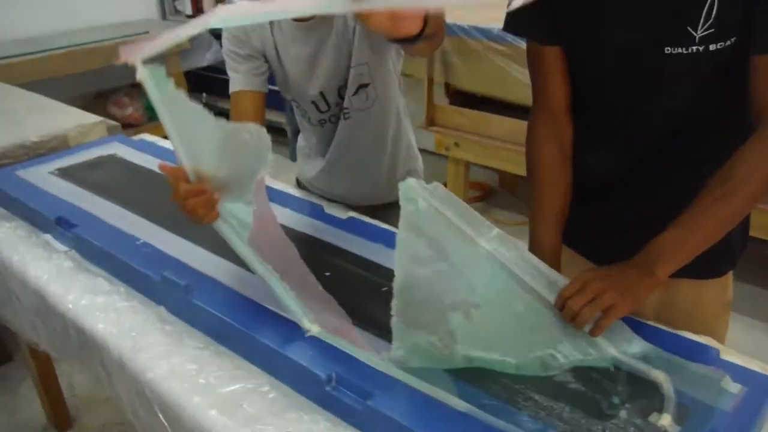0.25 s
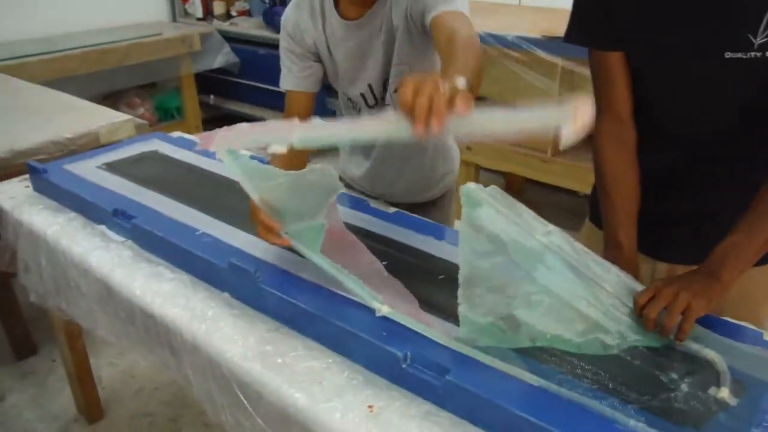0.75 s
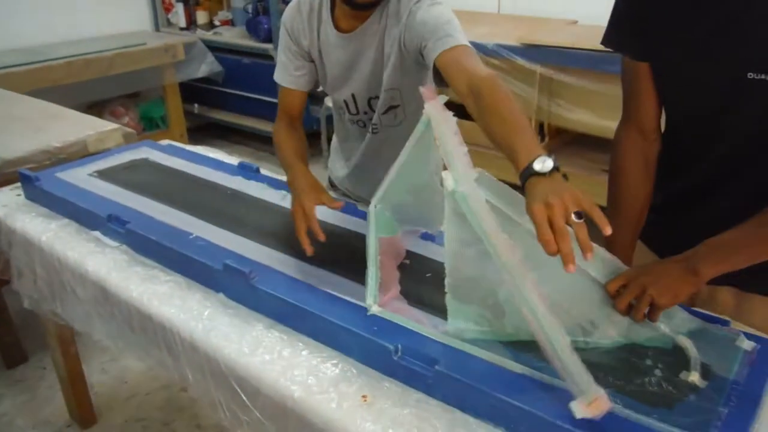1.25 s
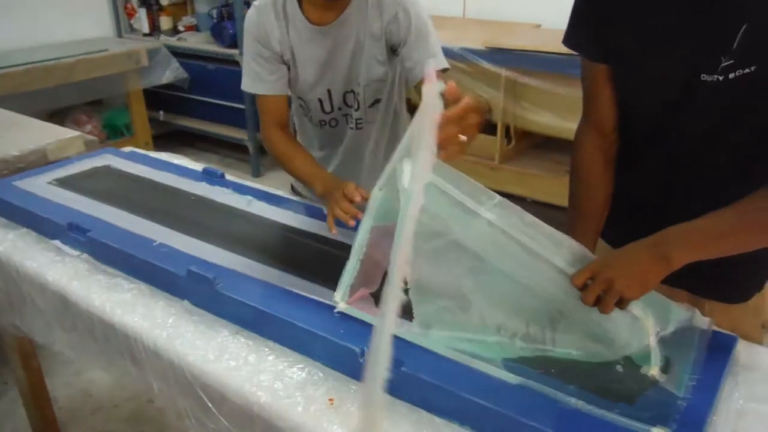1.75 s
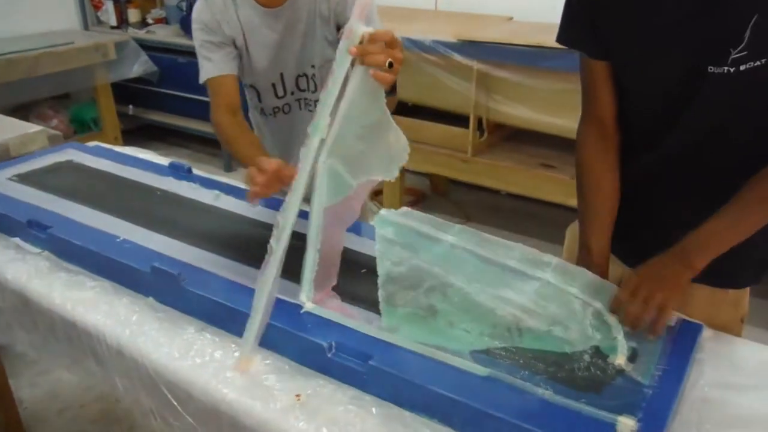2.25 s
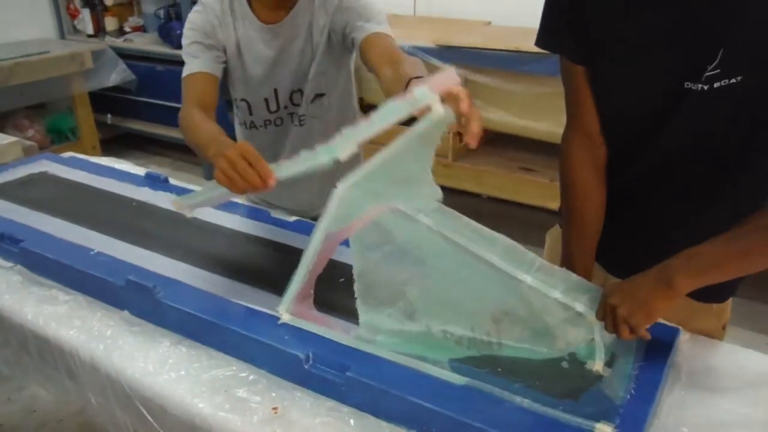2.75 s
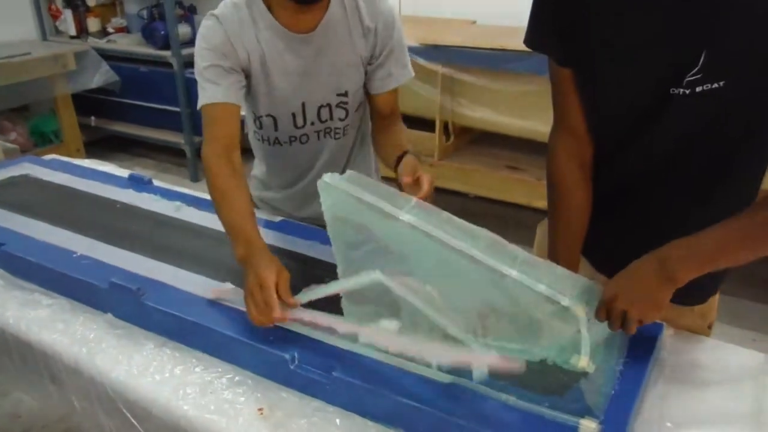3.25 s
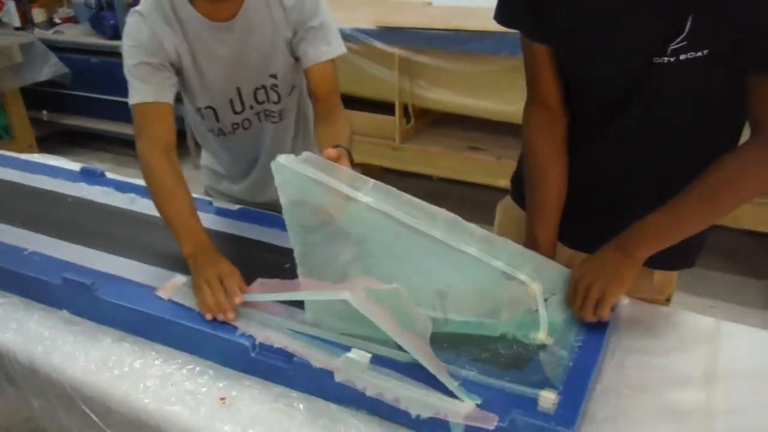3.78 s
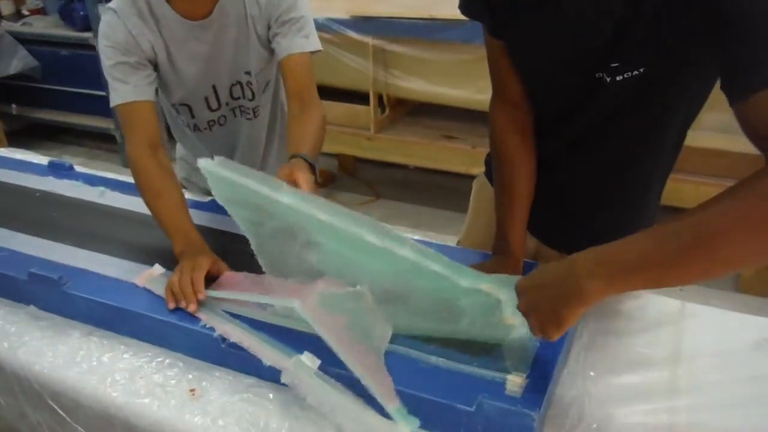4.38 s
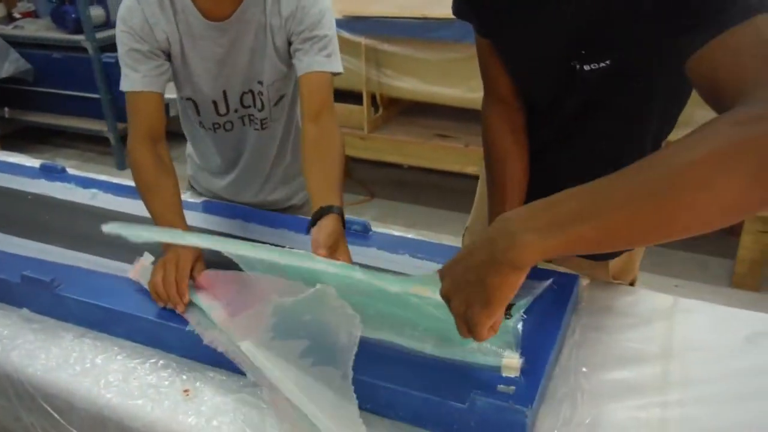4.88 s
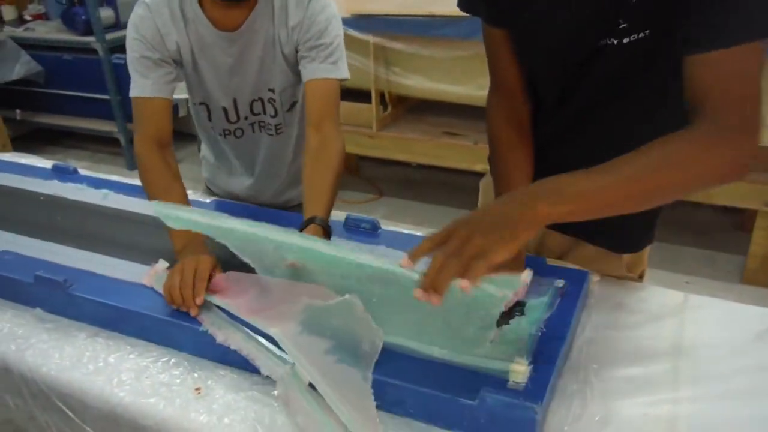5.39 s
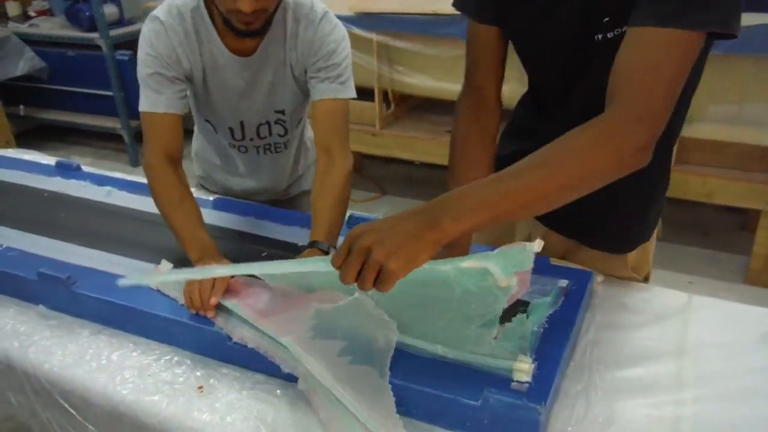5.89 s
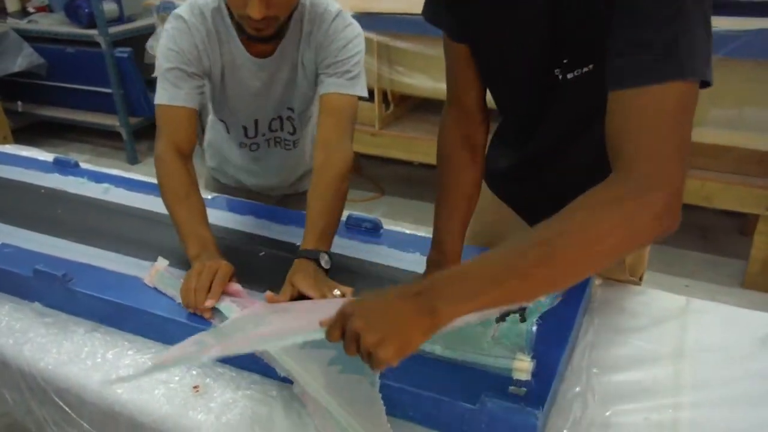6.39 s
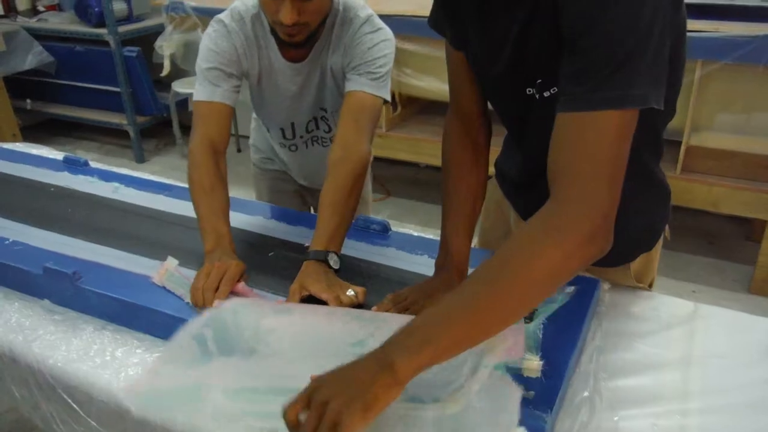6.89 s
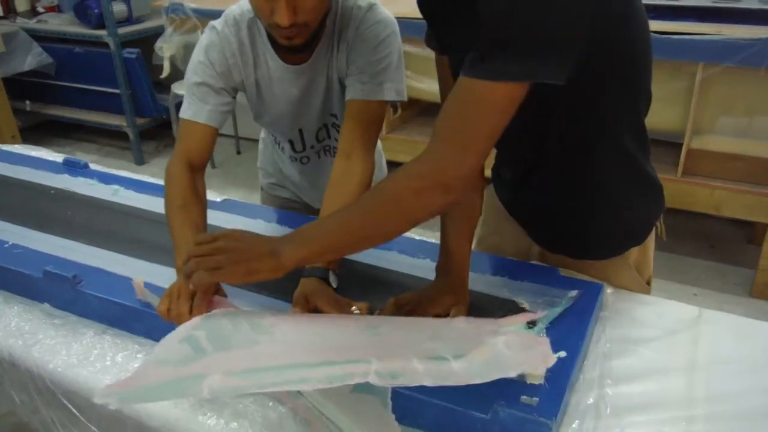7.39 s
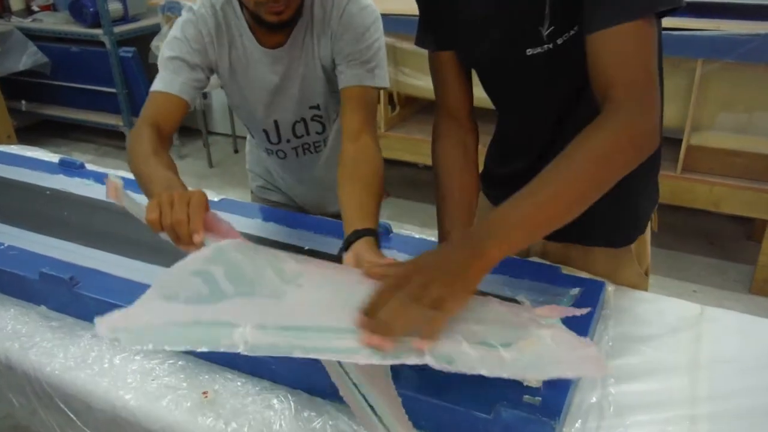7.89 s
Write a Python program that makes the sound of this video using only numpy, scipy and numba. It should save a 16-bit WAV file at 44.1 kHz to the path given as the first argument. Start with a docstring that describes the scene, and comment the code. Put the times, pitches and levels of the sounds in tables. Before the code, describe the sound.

A close view of stiff, thin plastic film handled on a hollow mould in a workshop with a short reverberant tail and faint steady hiss. It opens with a sliding rustle and a hard snap at 0.2 s. Around 1.0-1.2 s a pull crackles densely with rapid sharp pops; more tearing and a loose knock follow near 1.4-1.7 s. A quieter slide leads to another crackling cluster at 2.5-2.9 s, with a hollow buckling note. After light sliding and a small knock near 3.6 s, strong crackles and snaps run from 4.0 to 4.8 s. From 5 s handling softens to faint rubbing and rustle. Tiny high squeaks and clicks come around 6.0 s, a crisp knock at 6.65 s, a hollow slap and scrape at 7.1 s, a brief crackle with a dull landing at 7.8 s, then faint ticks.

```python
"""Thin cured plastic sheets and film are peeled by hand off a long hollow mould in a workshop and laid on it.
At first pulls crackle in swarms of tiny cracks, sheets slide, creases snap through and loose sheets knock the mould.
After five seconds the handling is mostly softer; stiff corners squeak near six seconds, and one late pull crackles.
Shaped noise forces sound through the crisp film edge, the flexing sheet and the mould, and the room rings on.
Resonators add buckling notes, rubbing tones and a bench drone, over bright film ticks and steady background noise."""
import sys
import numpy as np
from scipy import signal
from scipy.fft import rfft, irfft
from scipy.io import wavfile
from scipy.ndimage import uniform_filter1d
from numba import njit

SR = 44100
rng = np.random.default_rng(int(sys.argv[2]) if len(sys.argv) > 2 else 0)


def persist_wave(psi):
    """Save psi, clipped to +-1, as 16-bit WAV."""
    counts = np.round(np.clip(psi, -1, 1) * 32767).astype(np.int16)
    wavfile.write(sys.argv[1], SR, np.atleast_2d(counts).T)


N = 358974

# creases and bond spots that snap: start_s, level_db, sheet_relative_db, flutter_decay_ms
CREASE_SNAPS = [(.197, -11, -6.5, 3), (0.3456, -24.5, -22, 4.1), (0.4155, -24, -28, 1.6),
                (0.96, -17.5, -3.5, 2.5), (.9922, -23, -14, 2), (1.005, -12.5, -7.5, 3.9),
                (1.0208, -12.5, 0.5, 1.8), (1.0279, -13, 0, 3.3), (1.036, -15, -1, 4.6),
                (1.068, -13.5, -10, 3), (1.0918, -8.5, -0.5, 3.5), (1.363, -23.5, -6.5, 5.3),
                (1.528, -14, -7, 3), (1.5534, -11.5, -6, 4), (1.6025, -17, 4.5, 4.3),
                (2.029, -31.5, -11, 2.7), (2.318, -23.5, -5, 3.3), (2.493, -21.5, -2.5, 4.9),
                (2.5288, -17.5, 0, 1.3), (2.5715, -13.5, -1.5, 2.9), (2.622, -11.5, -4, 4),
                (2.644, -13, -7, 4.6), (2.6652, -14.5, -7, 3.1), (2.808, -15.5, -3, 2.5),
                (2.8472, -16.5, -3, 3.9), (2.92, -19, -2, 2.6), (3.372, -28, 3.5, 1.9),
                (3.5325, -15.5, -9, 1.5), (4.005, -18, -7, 1.9), (4.0187, -13.5, 1, 2.5),
                (4.0332, -10, -10, 1.8), (4.0592, -12.5, -14, 2), (4.12, -12, -5.5, 2.5),
                (4.207, -17, -19, 1.7), (4.6157, -20, -8, 3.5), (4.6405, -18, -3, 2.8),
                (4.7591, -15.5, -9, 3.4), (4.8113, -16, -11, 1.8), (5.1918, -39, -11, 1.8),
                (5.224, -29, 0, 2.2), (5.5188, -34, -16, 2.1), (5.5659, -30.5, -2, 3.5),
                (5.6518, -31.5, -8, 4.9), (5.77, -18, -8, 3.3), (5.8002, -23.5, -3.5, 3),
                (5.9856, -22.5, -3.5, 3.1), (6.0446, -20, -12, 4.8), (6.087, -21.5, -10, 2.8),
                (6.1322, -16, -8, 1.9), (6.2061, -19, -4.5, 1.4), (6.2627, -16.5, -14, 0.75),
                (6.4151, -23, -19, .8), (6.422, -18, -11, 3.7), (6.8606, -28.5, -13, 1.9),
                (7.212, -21.5, -1.5, 2.2), (7.652, -26, -14, 3), (7.723, -30, -14, 5.4),
                (7.817, -16, -4, 3.3), (7.87, -17, -21, 1.9), (8.0937, -33.5, -21, 3.4),
                (8.129, -24.5, -21, 2.5)]
# sheets and hands landing on the mould, and one crease snapping at 5.37 s that shakes the mould: start_s,
# level_db, # sheet_relative_db, mould_relative_db, rise_ms, clatter_decay_ms, contact_corner_hz,
# favoured_ring_hz, ring_relative_db
LANDINGS = [(0.539,-54.5,-5,9,2,4.9,6000,440,-14), (1.618,-18,2.5,-8,0.87,7.5,10000,443,-10),
            (2.14,-44.5,7,-4,0.3,7.9,10000,486,-19), (3.335,-36,8.5,-2,0.23,17.5,11000,656,-10.5),
            (3.592,-22,-8,-24,0.082,5.2,6400,1230,-28), (3.902,-33.5,10,-12,0.9,4.1,8870,1480,-14),
            (5.191,-31.5,1.5,-12,.3,3.9,11000,600,-21), (5.371,-46,1,-7,.5,26,11900,480,-24),
            (6.175,-32.5,12.5,-3,.4,5,7000,750,-25), (6.526,-27.5,5,-2.5,0.67,14,6960,496,-21),
            (6.654,-13.5,2,-15,0.077,3.7,11000,640,-34), (7.125,-15.5,-1.5,-23,1.5,8.2,7600,464,-11),
            (7.176,-26,-5,-17,1.5,16,10000,482,-14.5), (7.778,-18,-6,-10,5.5,7.2,12000,490,-30)]


def handling():
    """Superposition of independent forces: the powers of holding, pulls and slides add in edge, sheet and mould."""
    # faint rustle of sheets held in the hands: level_db, sheet_relative_db, mould_relative_db
    held_rustle = (-66.5, 2.3, -5)
    # pulls that tear the film off the mould: start_s, length_s, crackle_level_db, swell_over_pull_db,
    # sheet_relative_db, mould_relative_db
    pulls = [(0.0, 0.015, -24, -19, -2, -15.5), (1.018, 0.19, -30, -6.5, -6, -17.5),
             (1.36, 0.23, -32.5, 12.5, -7, -26), (1.606, 0.096, -22.5, -9.5, -4.5, -19.5),
             (2.535, 0.18, -29.5, -1, -3.5, -22), (2.81, 0.094, -25.5, 8, -6.5, -22.5),
             (4.031, 0.31, -28.5, -9.5, -5.5, -19), (4.322, 0.13, -24, 10, -8, -22.5),
             (4.454, 0.11, -23, 10, -6, -20), (4.717, 0.03, -29.5, 6.5, -4, -22),
             (7.798, 0.042, -35, 6, -2.5, -17)]
    # loose sheets sliding over the mould: start_s, length_s, level_db, swell_over_slide_db,
    # sheet_relative_db, mould_relative_db
    slides = [(0.0, 0.46, -43.5, -10.5, -6, -19), (0.496, 0.1, -53.5, 5.5, -4, -13),
              (0.807, 0.26, -45, 9.5, -2.5, -20), (1.192, 0.16, -40, 2, -2.5, -15),
              (1.887, 0.53, -51, 0, -5, -19), (2.259, 0.3, -44, -6, 1, -7.5), (2.72, .1, -38.5, 4, -8, -18),
              (2.924, .39, -45.5, -13.5, -4, -15), (3.415, 0.48, -53.5, 2.5, 1, -10),
              (3.581, 0.045, -44.5, 2.5, 9.5, -5), (3.902, 0.064, -41.5, 3, -2, -16),
              (4.582, 0.27, -39, -16, -1, -12), (4.895, 0.16, -52, -3, -1.5, -15),
              (5.196, .07, -57.5, -4, -12, -6), (5.37, 0.28, -54.5, 7, 1, -8),
              (5.671, 0.18, -46.5, 5.5, 2, -7), (5.967, 0.49, -42, -1.5, -3, -13.5),
              (6.427, 0.19, -41.5, 4, -0.5, -8), (6.775, 0.19, -55, 6, 2.5, -10),
              (7.13, 0.069, -31.5, -12, -5, -8.5), (7.497, .06, -50.5, 0, -8, -15),
              (7.636, 0.14, -43.5, 8, -7, -17), (7.908, 0.1, -45.5, 6.5, -7, -22),
              (8.106, 0.069, -52, 2, -3, -26)]
    power = np.outer(shares(*held_rustle) ** 2, np.ones(N))
    for movements, attack_s, release_s in [(pulls, .009, .026), (slides, .0038, .038)]:
        for s, length_s, db, swell_db, sheet_db, mould_db in movements:
            movement = stroke(length_s, db, swell_db, attack_s, release_s)
            add(power, s, np.outer(shares(0, sheet_db, mould_db), movement) ** 2)
    return np.sqrt(power)


def peeling(drive, cracks_per_s, spread_db, patchy_db, crack_s, rub, even_s):
    """Fracture noise: swarms of tiny cracks of very unequal size over the smooth rub of sliding film."""
    db = 20 * np.log10(drive[0])
    # a harder pull opens more cracks a second
    rate = cracks_per_s * amp(0.21 * (db - db.mean()))
    opens = rng.random(N) < rate / SR
    cracks = opens * amp(spread_db * np.minimum(rng.exponential(size=N), 4))
    grains = []
    for decay_s in crack_s:
        # each crack shakes edge, sheet and mould in its own proportions
        uneven = cracks * amp(patchy_db * rng.standard_normal(N))
        power = linger(uneven ** 2, decay_s)
        # the hand feeds in energy steadily, however it is split among the cracks
        power /= np.abs(uniform_filter1d(power, int(even_s * SR))) + 1e-9
        grains.append(np.sqrt((power + rub) / (1 + rub)))
    return drive * np.array(grains) * rng.standard_normal(N)


def snapping(rise_ms, plain_db, crease_db, width_hz, give_ms, give_db, size=1024):
    """Snap-through instability: a crease gives a little, then flips with a sharp click coloured by its length."""
    mould_relative_db = -23.5
    force = np.zeros((3, N))
    pitches = rng.uniform(3000, 8500, len(CREASE_SNAPS))
    noise_pairs = rng.standard_normal((len(CREASE_SNAPS), 2, size))
    for (s, db, sheet_db, decay_ms), hz, noises in zip(CREASE_SNAPS, pitches, noise_pairs):
        for start, stage_db, noise in zip([s - give_ms / 1000, s], [give_db, 0], noises):
            flutter = burst(noise, rise_ms, decay_ms)
            ring = resonance(flutter, np.full(size, hz), float(width_hz))
            edge = amp(plain_db) * flutter + amp(crease_db) * ring
            levels = shares(db + stage_db, sheet_db, mould_relative_db)
            add(force, start, levels[:, None] * np.array([edge, flutter, flutter]))
    return force


def crinkling(drive, creases_per_s, over_db, spread_db, decay_ms, most_db, size=1024):
    """Small random instabilities: creases flip above the crackle, up to the force a crease can hold."""
    force = np.zeros((3, N))
    for i in np.flatnonzero(rng.random(N) < creases_per_s / SR):
        scatter = rng.uniform(-1, 1)
        strength = drive[:, i] * amp(over_db + spread_db * scatter)
        # smooth ceiling on the edge force; all three shares shrink together
        strength /= np.hypot(1, strength[0] / amp(most_db))
        add(force, i / SR, np.outer(strength, burst(rng.standard_normal(size), 0, decay_ms)))
    return force


def knocking(size=4096):
    """Contact mechanics: many points land in quick succession, and a softer contact is duller."""
    force = np.zeros((3, N))
    for row, noise in zip(LANDINGS, rng.standard_normal((len(LANDINGS), size))):
        s, *levels, rise_ms, decay_ms, contact_hz = row[:-2]
        clatter = soften(burst(noise, rise_ms, decay_ms), contact_hz, order=2)
        add(force, s, np.outer(shares(*levels), clatter))
    return force


def ringing(octaves):
    """Modal superposition: the mould struck by a landing sheet rings on, and where the sheet lands favours the
    modes near one pitch."""
    # what the struck mould rings with: pitch_hz, relative_level_db, t60_s
    mould_modes = [(446,-15.5,0.33), (482,-1.5,0.61), (543,-27,0.47), (645,7,0.31), (745,14,0.41),
                   (969,2,.27), (1225,12,0.2), (1430,10,0.31), (1690,6,.16), (1920,-3,.12), (2290,-14,.4),
                   (3284,-7,.15), (3630,0,0.38)]
    t, out = np.arange(SR // 2) / SR, np.zeros(N)
    hz, db, t60 = np.transpose(mould_modes)[:, :, None]
    modes = amp(db) * np.sin(2 * np.pi * hz * t) * np.exp(-np.log(1000) * t / t60)
    for s, level_db, *_, favoured_hz, relative_db in LANDINGS:
        weights = 1 / (1 + (np.log2(hz / favoured_hz) / octaves) ** 2)
        add(out, s, amp(level_db + relative_db) * np.sum(weights * modes, axis=0))
    return out


def squeaking():
    """Excitation of narrow resonances: buckling sheet gives a hollow note, dragging stiff corners squeak higher."""
    # the sheet buckles: start_s, pitch_hz, level_db, decay_ms
    buckles = [(.198, 1440, -34, 54), (1.004, 1210, -23, 14), (1.065, 1160, -23, 7.9),
               (1.172, 1390, -27, 7.1), (1.511, 1180, -30.5, 9.1), (1.569, 1650, -27, 10),
               (2.62, 1810, -24, 32), (3.337, 1220, -46, 19), (3.597, 1180, -37, 25), (4.05, 1950, -29, 70),
               (4.235, 1590, -29, 28), (7.126, 710, -21, 8.1), (7.125, 1290, -19, 11),
               (7.66, 1590, -50, 100)]
    # a stiff corner drags and squeaks: start_s, pitch_hz, width_hz, level_db, decay_ms
    squeaks = [(5.947, 5950, 300, -32, 10), (5.985, 5780, 250, -23, 15), (5.986, 8540, 400, -31, 11),
               (6.043, 6100, 350, -38, 11), (6.044, 8850, 500, -35, 10)]
    buckle_width_hz = 190
    out = np.zeros(N)
    for s, hz, db, decay_ms in buckles:
        add(out, s, slipping(hz, buckle_width_hz, db, decay_ms))
    for s, *squeak in squeaks:
        add(out, s, slipping(*squeak))
    return out


def slipping(hz, width_hz, db, decay_ms, size=16384):
    """Stick-slip: a run of quick slips rings one narrow resonance, which keeps the energy of the slips."""
    slips = burst(rng.standard_normal(size), 0.71, decay_ms)
    tone = unit(resonance(slips, np.full(size, float(hz)), float(width_hz)))
    return amp(db) * np.linalg.norm(slips) * tone


def rubbing(attack_s, release_s):
    """Sustained friction: a steady slide of hand or sheet holds one narrow resonance as long as it lasts."""
    # faint rubbing tones: start_s, length_s, pitch_hz, level_db
    rubs = [(5.62, .25, 3420, -54), (5.703, 0.36, 2350, -52), (7.398, .24, 2290, -62)]
    width_hz = 80
    out = np.zeros(N)
    for (s, length_s, hz, db), friction in zip(rubs, rng.standard_normal((len(rubs), SR))):
        tone = resonance(friction, np.full(SR, float(hz)), float(width_hz))
        pressure = stroke(length_s, db, 0, attack_s, release_s)[:SR]
        add(out, s, pressure * tone[:len(pressure)] / tone.std())
    return out


def droning(attack_s, release_s):
    """Forced vibration: the friction of dragged sheets shakes the bench in its low resonances."""
    # bench resonances: pitch_hz, width_hz, relative_level_db
    bench_modes = [(62,14,-8), (132.4,7.6,4), (225,100,-1.5)]
    # sheets dragged along the mould: start_s, length_s, level_db, swell_over_drag_db
    drags = [(0.0, 0.25, -66, -8), (1.598, 0.077, -58, 5), (2.273, 0.21, -58, -13), (3.54, 0.2, -57, -3),
             (3.757, 0.89, -68, -3), (4.564, 0.096, -56, -1), (5.36, 0.51, -64, 11),
             (5.85, 0.89, -66.5, -4), (7.22, 0.089, -58, -0.5)]
    friction, pressure = rng.standard_normal(N), np.zeros(N)
    drone = np.zeros(N)
    for hz, width, db in bench_modes:
        drone += amp(db) * resonance(friction, np.full(N, float(hz)), float(width))
    for s, *drag in drags:
        add(pressure, s, stroke(*drag, attack_s, release_s))
    return pressure * drone / drone.std()


def settling(ticks_per_s, db, spread_db, decay_ms, hz, width_hz, tip_db, size=256):
    """Stress relaxation: thin film ticks, faint and bright, once with every snap alike and at random."""
    out = np.zeros(N)
    for (s, *_), noise in zip(CREASE_SNAPS, rng.standard_normal((len(CREASE_SNAPS), size))):
        add(out, s, amp(tip_db) * burst(noise, 0, decay_ms))
    for i in np.flatnonzero(rng.random(N) < ticks_per_s / SR):
        scatter = rng.uniform(-1, 1)
        add(out, i / SR, amp(db + spread_db * scatter) * burst(rng.standard_normal(size), 0, decay_ms))
    centre = np.full(N, float(hz))
    once = resonance(out, centre, float(width_hz))
    return resonance(once, centre, float(width_hz))


def bending(force, width_hz, bend_db, broad_db):
    """Stiffness sets pitch: the sheet's main resonance slides as the hands bend it."""
    # main resonance of the bent sheet: time_s, pitch_hz
    bend_path = [(.3, 1430), (1.0, 1270), (1.6, 1700), (2.3, 1500), (2.6, 1970), (2.95, 1760), (3.3, 1220),
                 (3.7, 1160), (4.051, 1920), (4.45, 1350), (4.65, 1650), (5.5, 1100), (6.6, 1930),
                 (7.12, 1340), (7.7, 1570)]
    hz = np.interp(np.arange(N) / SR, *np.transpose(bend_path))
    return amp(broad_db) * force + amp(bend_db) * resonance(force, hz, float(width_hz))


def radiating(edge, sheet, mould):
    """Radiation filtering: each body passes the band that suits its size and stiffness."""
    # colour of the crisp film edge: pitch_hz, relative_level_db
    edge_colour = [(1200,-51), (2100,-11), (2700,-3.5), (3250,-0.5), (4200,-0.5), (5900,1.5), (7500,-1),
                   (10500,-8.5), (13600,-18), (16000,-29)]
    # colour of the flexing sheet: pitch_hz, relative_level_db
    sheet_colour = [(350, -37.5), (540, -9), (650, 2), (820, -1), (1150, 1.5), (1500, 0), (1950, 1),
                    (2400, 0), (3100, 0), (4300, -7), (8000, -44)]
    # colour of the hollow mould: pitch_hz, relative_level_db
    mould_colour = [(30,-64), (95,-28), (125,-15), (160,-20), (260,-7), (360,-7), (480,2), (580,1),
                    (750,-3), (1600,-41.5)]
    return colour(edge, edge_colour) + colour(sheet, sheet_colour) + colour(mould, mould_colour)


def reverberating(forces, **room):
    """Exponential energy decay: edge, sheet and mould each excite the room with their own reverberation time."""
    # reverberation times of edge, sheet and mould sound: t60_s
    body_t60 = [0.46, 0.57, 0.51]
    return [workshop(force, t60, **room) for force, t60 in zip(forces, body_t60)]


def workshop(x, t60, wet_db, early_db, build_s, absorb_hz, count=12):
    """Room acoustics: a few reflections from bench and floor, then a diffuse field stores and loses energy."""
    early = np.zeros(SR // 10)
    delays_s = rng.uniform(.003, .022, count)
    early[(delays_s * SR).astype(int)] = rng.standard_normal(count)
    # t60 is the time for power to fall a millionfold
    stored = linger(linger(x ** 2, build_s), t60 / np.log(10 ** 6))
    diffuse = soften(np.sqrt(stored) * rng.standard_normal(N), absorb_hz)
    return x + amp(early_db) * convolve(x, unit(early)) + amp(wet_db) * diffuse


def background(level_db):
    """Stationary random noise: white noise filtered to the steady spectrum of the workshop."""
    # workshop background: pitch_hz, relative_density_db
    air_colour = [(25,-19), (60,-4), (100,-3), (250,-1), (500,-2), (1500,4), (5000,0.5), (9000,-7),
                  (16000,-33)]
    return amp(level_db) * colour(rng.standard_normal(N), air_colour)


def stroke(length_s, db, swell_db, attack_s, release_s):
    """Envelope of one hand movement: it takes hold, swells or fades steadily, and lets go."""
    t = np.arange(int((length_s + 10 * release_s) * SR)) / SR
    hold = amp(db + swell_db * (np.minimum(t / length_s, 1) - .5))
    return hold * np.minimum(t / attack_s, 1) * np.exp(-np.maximum(t - length_s, 0) / release_s)


def burst(noise, rise_ms, decay_ms):
    """Damped impact: a noisy flutter starts abruptly and dies away, its energy proportional to its decay."""
    rise, decay = np.maximum([rise_ms, decay_ms], .05) * SR / 1000
    n = np.arange(len(noise)) + 1
    flutter = np.tanh(noise) * (1 - np.exp(-n / rise)) * np.exp(-n / decay)
    return unit(flutter) * np.sqrt(decay / 2)


def shares(db, sheet_db, mould_db):
    """Force division: how hard one force drives edge, sheet and mould."""
    return amp([db, db + sheet_db, db + mould_db])


@njit
def resonance(x, hz, width):
    """Second-order resonator: a band-pass whose centre may move, with gain 1 at the centre."""
    y, band, low = np.empty(len(x)), 0., 0.
    for i in range(len(x)):
        g, k = np.tan(np.pi * hz[i] / SR), width / hz[i]
        v = (band + g * (x[i] - low)) / (1 + g * (g + k))
        band, low, y[i] = 2 * v - band, low + 2 * g * v, k * v
    return y


def colour(x, points, size=4096):
    """Minimum-phase filtering: a causal filter has the given spectrum, and white noise keeps its power."""
    log_gain = np.log(amp(on_log_axis(np.fft.rfftfreq(size, 1 / SR), points)))
    # folding the cepstrum forward in time makes the response causal
    cepstrum = irfft(log_gain)
    cepstrum[1:size // 2] *= 2
    cepstrum[size // 2 + 1:] = 0
    return convolve(x, unit(irfft(np.exp(rfft(cepstrum)))))


def soften(x, hz, order=1):
    """Treble absorption: a gentle low-pass."""
    return signal.lfilter(*signal.butter(order, hz, fs=SR), x)


def linger(power, decay_s):
    """Energy storage: each bit of power is spread over an exponential decay."""
    keep = np.exp(-1 / (decay_s * SR))
    return signal.lfilter([1 - keep], [1, -keep], power)


def convolve(x, response):
    """Linear superposition: pass a sound through an impulse response."""
    return signal.fftconvolve(x, response)[:N]


def amp(db):
    """Logarithmic level: decibels to amplitude gain."""
    return 10 ** (np.asarray(db) / 20)


def on_log_axis(hz, points):
    """Logarithmic pitch scale: interpolate (Hz, value) points along it."""
    f, value = np.transpose(points)
    return np.interp(np.log(np.maximum(hz, 1)), np.log(f), value)


def unit(x):
    """Energy normalisation: scale the sum of squares to one."""
    return x / np.sqrt(np.sum(x ** 2))


def add(track, s, sound):
    """Superposition: mix a sound into a track from time s on."""
    start = int(np.clip(s * SR, 0, N - 1))
    track[..., start:start + sound.shape[-1]] += sound[..., :N - start]


def scene():
    """Source, body and room in series: forces sound through edge, sheet and mould; other sounds are added."""
    drive = handling()
    # crack_s holds the crack decays of edge, sheet and mould; rub is a power relative to the cracks
    crackle = peeling(drive, cracks_per_s=500, spread_db=3.2, patchy_db=2.0,
                      crack_s=[.0007, .0013, .003], rub=.18, even_s=0.0385)
    snaps = snapping(rise_ms=0.065, plain_db=-3.0, crease_db=-1.0, width_hz=1280, give_ms=3.5, give_db=-19.5)
    creases = crinkling(drive, creases_per_s=14, over_db=7, spread_db=6, decay_ms=3.0, most_db=-14.5)
    forces = crackle + creases + snaps + knocking()
    edge, sheet, mould = reverberating(forces, wet_db=-2.5, early_db=-10.5, build_s=0.0022, absorb_hz=12100)
    sheet = bending(sheet, width_hz=570, bend_db=-9.5, broad_db=-2.0)
    plastic = radiating(edge, sheet, mould)
    ticks = settling(ticks_per_s=11, db=-52, spread_db=5, decay_ms=.7, hz=11000, width_hz=8100, tip_db=-32)
    rubs = rubbing(attack_s=.03, release_s=.04)
    drone = droning(attack_s=.03, release_s=0.07)
    friction = squeaking() + rubs + drone
    return (plastic + ringing(octaves=0.079) + friction + ticks + background(level_db=-56))[None]


def record(dry):
    """Saturation and band limiting: the highest peaks are rounded and the top is cut steeply."""
    top_hz = 16000
    rounded = .8 * np.tanh(dry / .8)
    return signal.sosfilt(signal.ellip(10, .2, 70, top_hz, fs=SR, output="sos"), rounded)


dry = scene()
out = record(dry)
persist_wave(out)
```